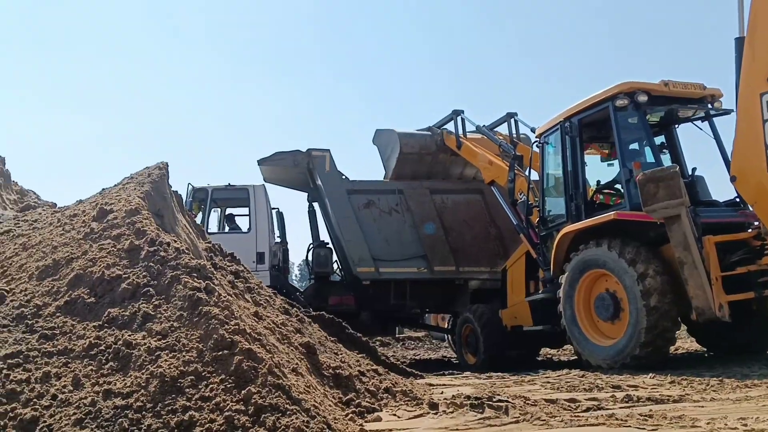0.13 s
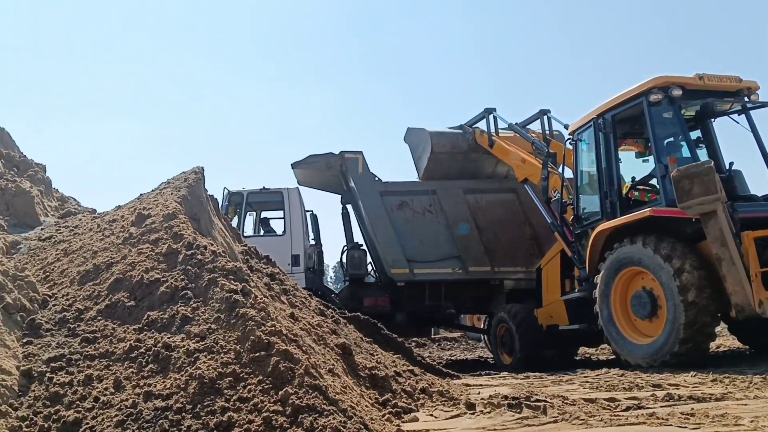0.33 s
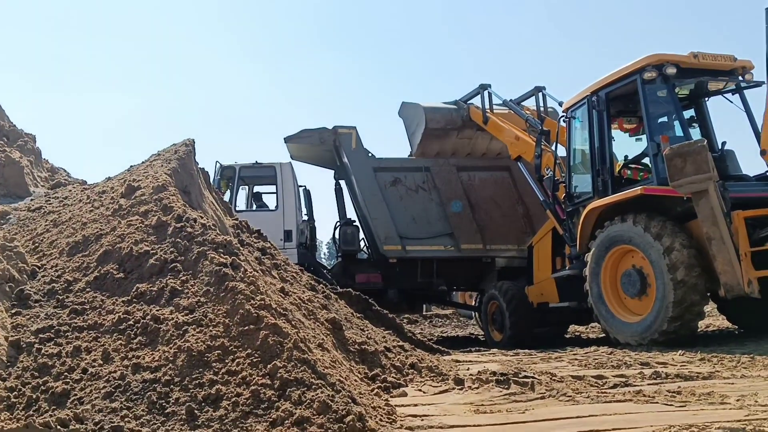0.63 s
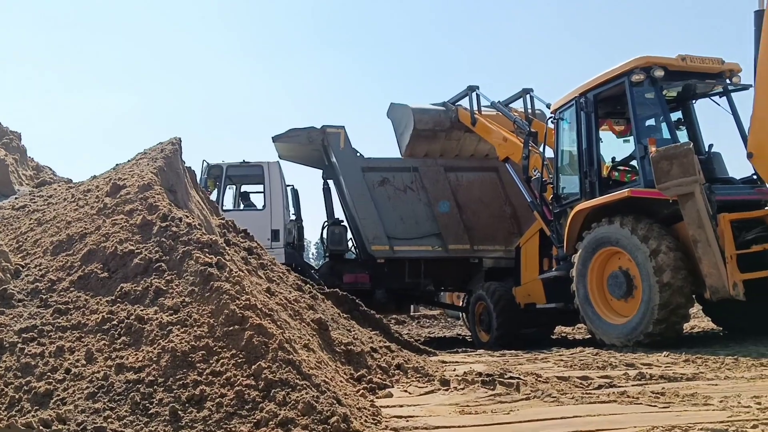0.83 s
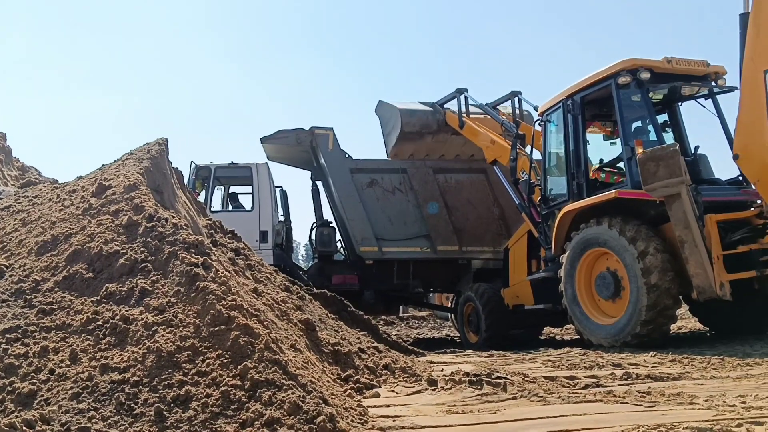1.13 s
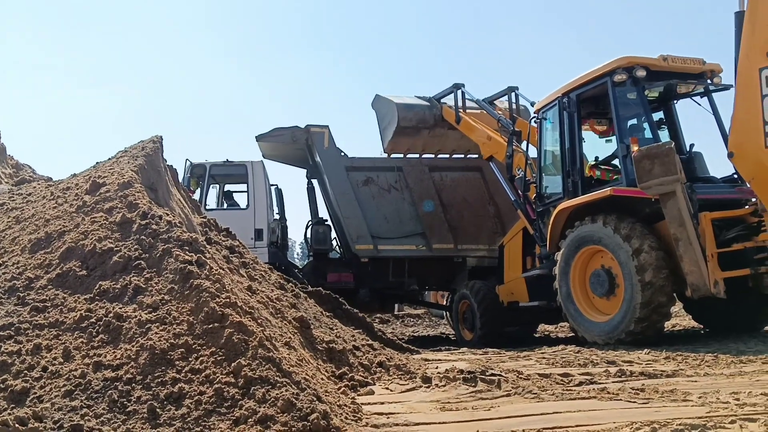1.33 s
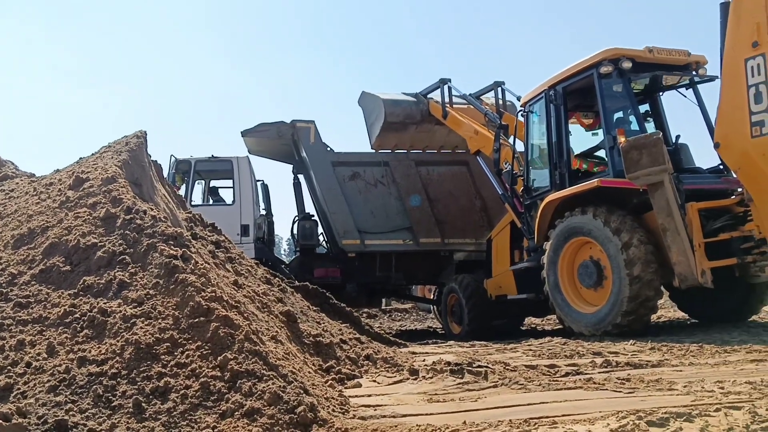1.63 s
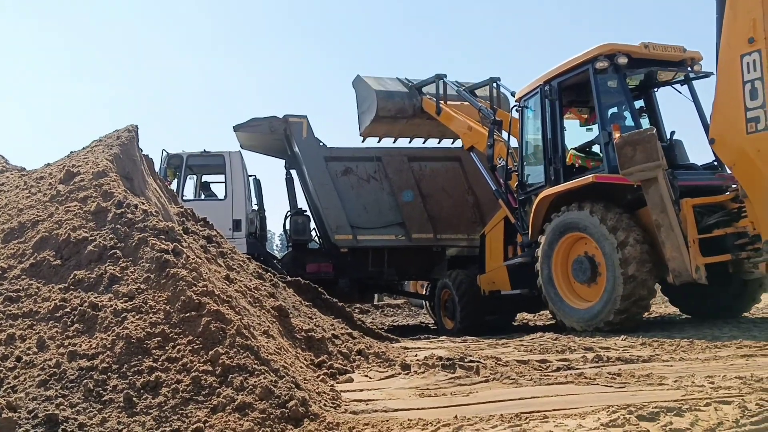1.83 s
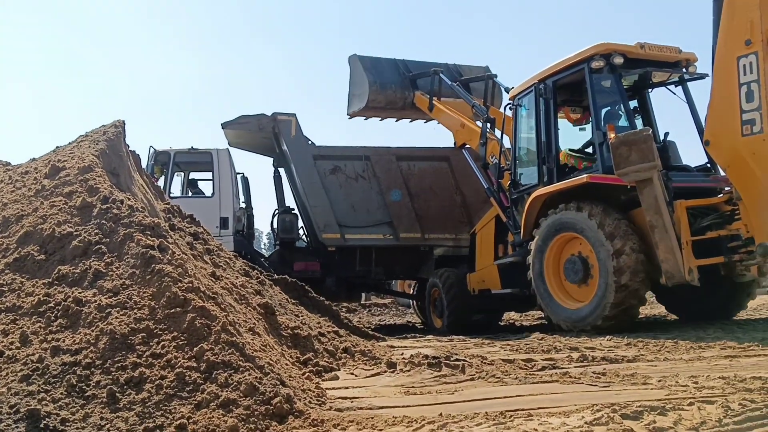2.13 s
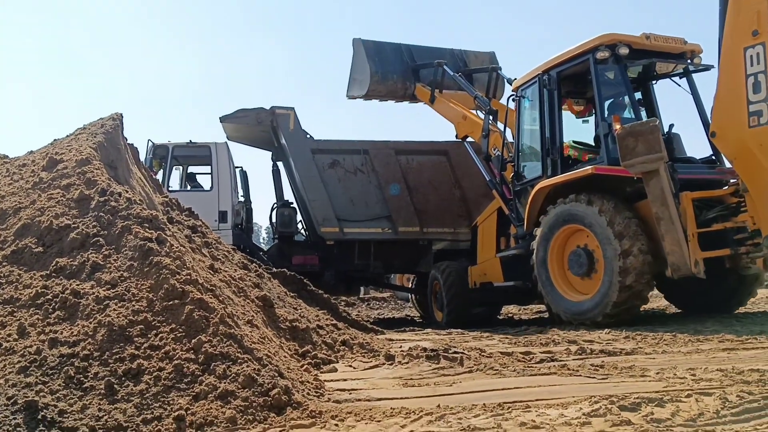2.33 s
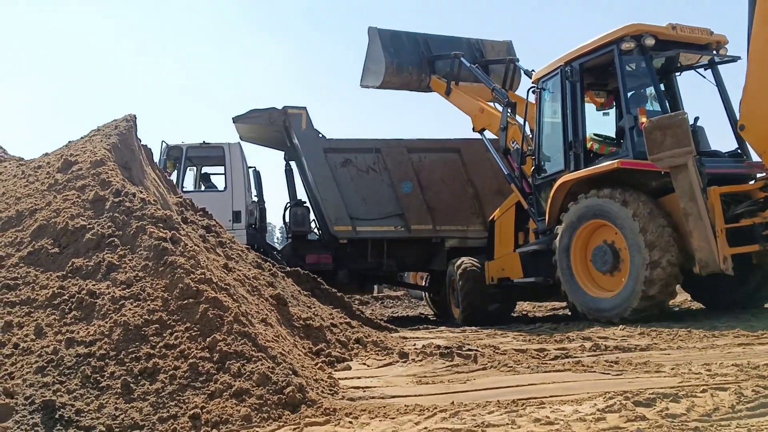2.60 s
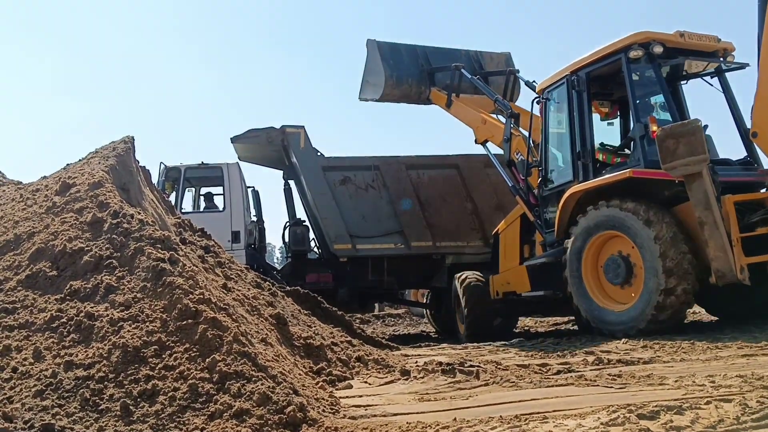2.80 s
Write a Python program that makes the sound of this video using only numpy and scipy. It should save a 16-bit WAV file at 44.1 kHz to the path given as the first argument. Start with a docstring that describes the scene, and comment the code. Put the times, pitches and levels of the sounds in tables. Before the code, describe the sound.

Loader bucket shaken empty over a truck bed, metallic clanks and thuds over a rumbling diesel.

```python
"""A backhoe loader shakes its bucket empty over a truck bed, then revs its diesel and lifts the arm.
Rough firings fill a rumbling body over faint site air; a growl sinks and the turbo whistle runs down.
From 0.27 s loose bucket pins rattle as dense knocks on ringing steel, and the truck bed thuds below.
A pump hums from about 1 s, and a few grains tick close by as short tones with noise snaps.
After 2.2 s the firings quicken, exhaust drones swell, and whistle and hum, both narrow noise, return."""
import sys
import numpy as np
from scipy import signal
from scipy.io import wavfile
from scipy.ndimage import uniform_filter1d

SR = 44100
rng = np.random.default_rng(int(sys.argv[2]) if len(sys.argv) > 2 else 0)


def master_out(mix):
    """Clip the mix to full scale and print it as 16-bit PCM to the path in sys.argv[1]."""
    frames = np.transpose(np.atleast_2d(mix))
    ceiling = np.clip(frames, -1, 1)
    pcm = np.round(ceiling * 32767).astype(np.int16)
    wavfile.write(sys.argv[1], SR, pcm)


N = 130536

# engine layers: (t/s, rumble level/dB, clatter level/dB, hiss level/dB)
ENGINE_LEVELS = [(.05, -16.5, -29, -51.5), (.3, -24.5, -34, -57), (.53, -18, -25.5, -62),
                 (.68, -25, -37, -57), (.92, -27.5, -37.5, -55.5), (1.2, -25.5, -36.5, -53),
                 (1.61, -27, -41, -54.5), (1.8, -26.5, -38, -57), (1.96, -26, -31, -61),
                 (2.12, -24.5, -37, -55), (2.29, -30, -37.5, -49.5), (2.45, -23, -33, -48),
                 (2.66, -21, -32, -42.5), (2.96, -21, -30, -45)]
# engine speed before jitter: (t/s, firings per s)
FIRING_RATE = [(.05, 57), (2.2, 50), (2.96, 56)]
# relative spectra of the engine layers: (f/Hz, level/dB per Hz)
RUMBLE_SPECTRUM = [(15, -81), (50, -11), (118, -1), (205, -2), (525, -8.5), (700, -17.5), (1200, -37.5),
                   (2000, -69.5)]
CLATTER_SPECTRUM = [(290, -22), (430, 1.5), (740, -4), (1560, -11.5), (2150, -12.5), (2600, -11),
                    (3300, -20), (3700, -22), (4400, -26.5), (7000, -36.5), (9100, -31), (15400, -100)]
HISS_SPECTRUM = [(3000, -45), (5000, -33), (6630, -1), (7500, -6), (8300, 3), (9300, 8.5), (10300, 1),
                 (11700, -12.5), (16000, -16)]
# booming panels and pipe: (f/Hz, mean level/dB above the broad spectrum)
BODY_MODES = [(105, 8.5), (130, 6.5), (165, 3), (205, 9), (270, 6.5), (362, 9), (445, 0.5)]
# wavering engine block resonances: (mean f/Hz, early level/dB, late level/dB), levels re clatter
BLOCK_MODES = [(1197, -26, -11.5), (1293, -6.5, -23), (2108, -6, -25), (2584, -12.5, -19.5),
               (3050, -40, -16)]
# growl that sinks as the load comes off: (t/s, f/Hz, level/dB)
GROWL_TRACK = [(.05, 284, -19), (.17, 266, -22.5), (.3, 221, -30), (.45, 225, -55)]
# turbo whistle: (t/s, f/Hz, level/dB)
TURBO_TRACK = [(.05, 13000, -67), (.3, 10800, -68), (.75, 9400, -61), (1.1, 8100, -60), (1.3, 7900, -75),
               (2.4, 8100, -75), (2.54, 8550, -53), (2.66, 9250, -49), (2.75, 9550, -45), (2.82, 9600, -52),
               (2.96, 9100, -60)]
# steady site air, relative spectrum: (f/Hz, level/dB per Hz)
AIR_SPECTRUM = [(8000, -30), (11000, 0)]
# bucket shakes: (start t/s, rise/s, hold/s, fall/dB per s, rattle level/dB, thud level/dB,
# rattle tilt/dB per octave, main ring f/Hz, main boom f/Hz)
SHAKE_EVENTS = [(0.274, 0.0078, 0.029, 314, -30.5, -31, -2, 1290, 110),
                (0.351, 0.002, 0.052, 215, -21, -22.5, -3, 1283, 243),
                (0.45, 0.041, 0.02, 336, -12.5, -14, -3.5, 1080, 140),
                (0.628, 0.0098, 0.012, 257, -21, -18, -4.5, 1810, 178),
                (0.68, 0.004, 0.0059, 304, -28.5, -40, -3.5, 1070, 252),
                (0.963, 0.013, 0.019, 194, -33.5, -19, -2, 1490, 160),
                (1.007, 0.011, 0.032, 172, -22, -14.5, -2, 1120, 113),
                (1.069, .004, 0.016, 198, -30, -28, -7.5, 1030, 300),
                (1.122, 0.006, 0.0043, 196, -23.5, -28, -9.5, 2830, 266),
                (1.295, 0.0063, 0.02, 244, -48, -21, -27, 1010, 129),
                (1.7, 0.015, 0.027, 253, -37.5, -23, 0, 2210, 180),
                (1.821, 0.0076, 0.067, 325, -19, -28.5, -2, 1445, 495),
                (1.993, 0.019, 0.04, 477, -22, -18.5, 1.5, 1980, 180),
                (2.188, 0.0016, 0.0026, 484, -33, -30, 4, 2770, 200.4),
                (2.257, 0.0059, 0.053, 162, -31.5, -24.5, -3.5, 2500, 185),
                (2.487, 0.013, 0.025, 215, -32.5, -30, 1.5, 1240, 360),
                (2.901, 0.036, .05, 100, -25, -27.5, -9.5, 1080, 378)]
# relative spectra of rattle and thud: (f/Hz, level/dB per Hz)
RATTLE_SPECTRUM = [(150, -27), (300, -6), (580, -6), (1100, -10.5), (1640, -11), (2570, -8.5),
                   (3500, -15.5), (4500, -23.5), (7300, -32), (9170, -23), (11000, -37.5), (16000, -56)]
THUD_SPECTRUM = [(20, -46.5), (84, -5), (130, 0.5), (354, -14.5), (600, -26.5), (1200, -68)]
# ringing steel: (f/Hz, mean level/dB above the broad spectrum)
STEEL_MODES = [(1110, 8), (1285, 4), (1400, 9), (1795, 6.5), (2020, 10.5), (2210, 4), (2480, 4.5),
               (2650, 3.5), (2880, 7.5), (3050, 2), (3225, 6), (3500, 8.5), (4110, 10), (4500, 9.5)]
# hydraulic pump hum: (t/s, f/Hz, level/dB)
PUMP_TRACK = [(1.1, 1000, -30), (1.22, 973, -41.5), (2.1, 930, -57), (2.45, 958, -35.5), (2.75, 930, -32.5),
              (2.96, 940, -45)]
# grain ticks: (t/s, tone level/dB, tone f/Hz)
TICK_EVENTS = [(1.091, -29.5, 9500), (1.4133, -20.5, 7700), (1.4163, -25, 8300), (1.4202, -15, 8650),
               (1.430, -24.5, 11400), (1.508, -36, 9500), (2.541, -25, 8360)]
# exhaust drones under load: (t/s, f/Hz, level/dB)
LOW_DRONE_TRACK = [(2.3, 99.4, -40), (2.5, 110, -35), (2.7, 118, -28), (2.96, 126.3, -19.5)]
HIGH_DRONE_TRACK = [(2.3, 189, -38), (2.5, 189.5, -38), (2.7, 210, -24), (2.96, 193, -46)]

FIRING_JITTER_RMS, FIRING_SPREAD_DB, FIRING_SHARE = .12, 9, .2
LUMPS_RMS_DB, HISS_FLUTTER_RMS_DB = 1.9, 1.86
KNOCK_DEPTH, KNOCK_DECAY_FIRINGS = .36, .33
BLOCK_WIDTH_HZ, BLOCK_WAVER_RMS, BLOCK_SWELL_RMS_DB = 98, .018, 3  # width per pass, two passes
GROWL_WIDTH_HZ, TURBO_WIDTH_HZ, PUMP_WIDTH_HZ, DRONE_WIDTH_HZ = 74, 140, 65, 9  # per pass, two passes
AIR_DB = -58.5
KNOCKS_PER_S, KNOCK_SPREAD_DB = 2200, 2.
STEEL_WIDTH_HZ, BODY_WIDTH_HZ, MODE_SPREAD_DB = 47, 21.2, 6.
MAIN_RING_WIDTH_HZ, MAIN_RING_DB = 47, 11
MAIN_BOOM_WIDTH_HZ, MAIN_BOOM_DB, THUD_LAG_S = 25, 8.5, .0095
TICK_WIDTH_HZ = 260
SNAP_DB, SNAP_HZ, SNAP_WIDTH_HZ, SNAP_DECAY_S = -4, 9100, 4000, .0035  # width per pass, three passes
START_S, CEILING, EDGE_HZ = .0435, .95, 15830


def gain_of(db):
    """Decibels to amplitude gain."""
    return 10 ** (np.asarray(db) / 20)


def evened(x):
    """Scales to rms 1."""
    return x / np.sqrt(np.mean(x ** 2) + 1e-20)


def track(rows, col):
    """One column of a table as a curve over the samples."""
    return np.interp(np.arange(N) / SR, [r[0] for r in rows], [r[col] for r in rows])


def wander(size):
    """Slow random curve of rms 1: noise averaged twice over size samples."""
    return evened(uniform_filter1d(uniform_filter1d(rng.standard_normal(N), size), size))


def struck(modes, width_hz):
    """Modes as (Hz, width Hz, dB), each struck harder or softer at random."""
    luck = rng.uniform(-1, 1, len(modes))
    return [(hz, width_hz, db + MODE_SPREAD_DB * u) for (hz, db), u in zip(modes, luck)]


def colour(x, spectrum, modes=(), tilt_db=0.):
    """Minimum-phase filter: broad spectrum tilted about 1.5 kHz, modes standing out of it; rms 1."""
    size = 8192
    f_hz, level_db = np.transpose(spectrum)
    hz = np.abs(np.fft.fftfreq(size, 1 / SR)) + 1
    broad_db = np.interp(np.log(hz), np.log(f_hz + 1), level_db)
    broad_db = broad_db + tilt_db * np.log2(np.clip(hz, 300, 6000) / 1500)
    peak_power = 1
    for mode_hz, width_hz, top_db in modes:
        peak_power = peak_power + gain_of(2 * top_db) / (1 + (2 * (hz - mode_hz) / width_hz) ** 2)
    log_gain = np.log(gain_of(np.maximum(broad_db, -100)) * np.sqrt(peak_power))
    # the Hilbert transform of the log gain gives the causal phase
    taps = np.fft.ifft(np.exp(np.conj(signal.hilbert(log_gain)))).real[:size // 2]
    return evened(signal.oaconvolve(x, taps)[:len(x)])


def resonate(x, hz, width_hz):
    """Resonance following the curve hz: shift to 0 Hz, one-pole low-pass, shift back."""
    turn = np.exp(2j * np.pi * np.cumsum(hz * np.ones(len(x))) / SR)
    r = np.exp(-np.pi * width_hz / SR)
    return 2 * (turn * signal.lfilter([1 - r], [1, -r], x / turn)).real


def whine(rows, width_hz, steady=0.):
    """Narrow noise on a pitch and level curve; steady flattens its envelope; fades in before row 1."""
    hz = track(rows, col=1)
    tone = resonate(resonate(rng.standard_normal(N), hz, width_hz), hz, width_hz)
    envelope = np.abs(signal.hilbert(tone)) / np.std(tone)
    tone /= (envelope + .3) ** steady
    fade = np.clip((np.arange(N) / SR - rows[0][0]) / .1 + 1, 0, 1)
    return fade * gain_of(track(rows, col=2)) * evened(tone)


def body_rumble(turns, strength):
    """Uneven firings and exhaust noise boom in the body panels and pipe."""
    fires = strength * (np.diff(np.floor(turns), prepend=0) > 0)
    exhaust = rng.standard_normal(N) * gain_of(LUMPS_RMS_DB * wander(size=900))
    drive = FIRING_SHARE * evened(fires - fires.mean()) + (1 - FIRING_SHARE) * exhaust
    sway = np.pi * wander(size=6000)  # which panels boom most keeps shifting
    rumble = 0
    for k in range(3):
        boom = colour(drive, RUMBLE_SPECTRUM, struck(BODY_MODES, BODY_WIDTH_HZ))
        rumble = rumble + (1 + np.cos(sway + k * 2 * np.pi / 3)) * boom
    return evened(rumble)


def block_clatter(turns, strength):
    """Each firing knocks the block with a noise burst and stirs its wavering resonances."""
    burst = 1 + KNOCK_DEPTH * strength * np.exp(-(turns % 1) / KNOCK_DECAY_FIRINGS)
    knocks = rng.standard_normal((2, N)) * burst
    late = np.clip(2 * np.arange(N) / SR - 1, 0, 1)  # early to late levels over 0.5-1 s
    clatter = colour(knocks[0], CLATTER_SPECTRUM)
    for hz, early_db, late_db in BLOCK_MODES:
        path_hz = hz * (1 + BLOCK_WAVER_RMS * wander(size=1500))
        band = resonate(knocks[1], path_hz, BLOCK_WIDTH_HZ)
        band = evened(resonate(band, path_hz, BLOCK_WIDTH_HZ))
        level_db = early_db + (late_db - early_db) * late
        clatter = clatter + band * gain_of(level_db + BLOCK_SWELL_RMS_DB * wander(size=1500))
    return clatter


def intake_hiss():
    """The intake hisses: fluttering noise in a high band."""
    flutter = gain_of(HISS_FLUTTER_RMS_DB * wander(size=300))
    return colour(rng.standard_normal(N) * flutter, HISS_SPECTRUM)


def engine():
    """Jittered firings of uneven strength drive rumble and clatter; hiss joins them."""
    rate = track(FIRING_RATE, col=1) * (1 + FIRING_JITTER_RMS * wander(size=500))
    turns = np.cumsum(rate) / SR  # firings so far
    strengths = gain_of(FIRING_SPREAD_DB * rng.uniform(-1, 1, 400))
    strength = strengths[turns.astype(int) % 400]
    layers = body_rumble(turns, strength), block_clatter(turns, strength), intake_hiss()
    return sum(gain_of(track(ENGINE_LEVELS, col=k + 1)) * x for k, x in enumerate(layers))


def site_air():
    """Steady faint noise, weighted to the treble."""
    return gain_of(AIR_DB) * colour(rng.standard_normal(N), AIR_SPECTRUM)


def growl():
    """Low narrow noise, slightly steadied, that sinks and fades."""
    return whine(GROWL_TRACK, GROWL_WIDTH_HZ, steady=.17)


def turbo_whistle():
    """High narrow noise whose pitch runs down, then spools up."""
    return whine(TURBO_TRACK, TURBO_WIDTH_HZ)


def shake(start, rise, hold, fall_db, rattle_db, thud_db, tilt_db, main_hz, boom_hz):
    """Dense knocks of loose pins ring the steel, one part most; the truck bed thuds below."""
    size = 16000
    t = np.arange(size) / SR
    fall = gain_of(-fall_db * np.maximum(t - rise - hold, 0))
    shape = np.clip(t / max(rise, 1e-3), 0, 1) ** 2 * fall
    knocks = (rng.random(size) < KNOCKS_PER_S / SR) * rng.choice([-1., 1.], size)
    knocks *= gain_of(KNOCK_SPREAD_DB * np.minimum(rng.exponential(1, size), 3))
    rings = struck(STEEL_MODES, STEEL_WIDTH_HZ) + [(main_hz, MAIN_RING_WIDTH_HZ, MAIN_RING_DB)]
    rattle = colour(knocks, RATTLE_SPECTRUM, rings, tilt_db)
    late_shape = np.interp(t - THUD_LAG_S, t, shape, left=0)
    booms = struck(BODY_MODES, BODY_WIDTH_HZ) + [(boom_hz, MAIN_BOOM_WIDTH_HZ, MAIN_BOOM_DB)]
    thud = colour(rng.standard_normal(size), THUD_SPECTRUM, booms)
    return start, gain_of(rattle_db) * shape * rattle + gain_of(thud_db) * late_shape * thud


def pump_hum():
    """Narrow noise near 950 Hz from the hydraulic pump."""
    return whine(PUMP_TRACK, PUMP_WIDTH_HZ)


def tick(start, db, hz):
    """A grain: decaying high tone plus a short bright noise snap."""
    t = np.arange(600) / SR
    snap = rng.standard_normal(600) * np.exp(-t / SNAP_DECAY_S)
    for _ in range(3):
        snap = resonate(snap, SNAP_HZ, SNAP_WIDTH_HZ)
    attack = np.minimum(t / .0005, 1)
    tone = np.sin(2 * np.pi * hz * t) * np.exp(-np.pi * TICK_WIDTH_HZ * t) * attack
    return start, gain_of(db) * (tone + gain_of(SNAP_DB) * snap)


def exhaust_drones():
    """Two very narrow noise tones under load, the low one steadier."""
    low = whine(LOW_DRONE_TRACK, DRONE_WIDTH_HZ, steady=1.)
    return low + whine(HIGH_DRONE_TRACK, DRONE_WIDTH_HZ, steady=.53)


def add(mix, start_s, sound):
    """Mixes a sound in at start_s, cut at the end of the mix."""
    part = mix[round(start_s * SR):][:len(sound)]
    part += sound[:len(part)]


def scene():
    """Sums continuous layers, then adds shakes and ticks."""
    mix = engine() + site_air() + growl() + turbo_whistle() + pump_hum() + exhaust_drones()
    for row in SHAKE_EVENTS:
        add(mix, *shake(*row))
    for row in TICK_EVENTS:
        add(mix, *tick(*row))
    return mix[None]


def record(dry):
    """Short silence at the start, soft rounding of the loudest peaks, then a low-pass."""
    gated = dry * np.clip((np.arange(N) / SR - START_S) / .0003, 0, 1)
    rounded = gated / (1 + (np.abs(gated) / CEILING) ** 4) ** .25
    low_pass = signal.firwin(511, EDGE_HZ, window=("kaiser", 9), fs=SR)
    return signal.oaconvolve(rounded, low_pass[None], "same")


dry = scene()
out = record(dry)
master_out(out)
```